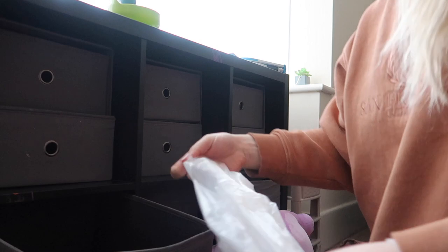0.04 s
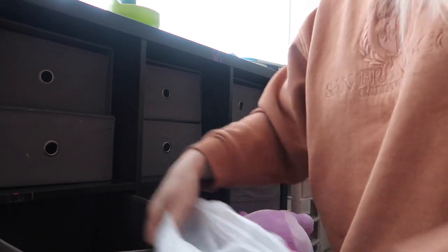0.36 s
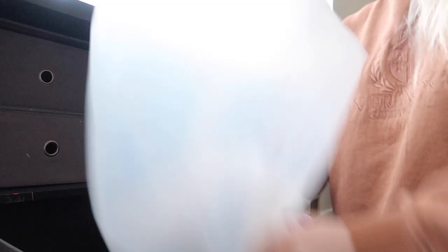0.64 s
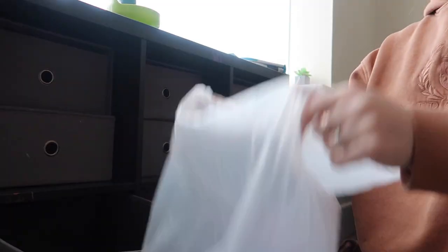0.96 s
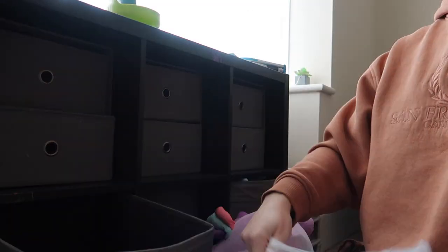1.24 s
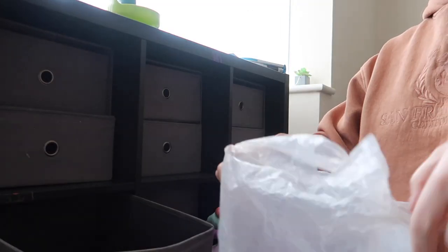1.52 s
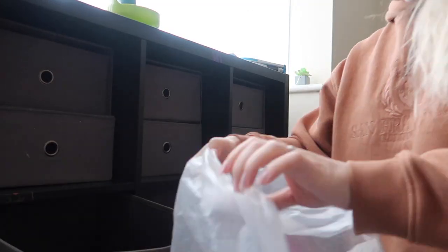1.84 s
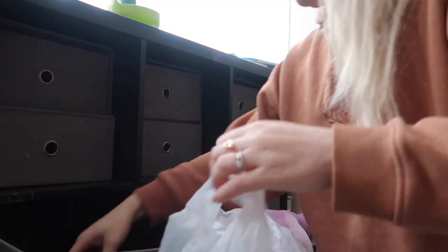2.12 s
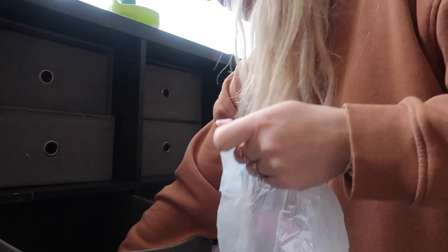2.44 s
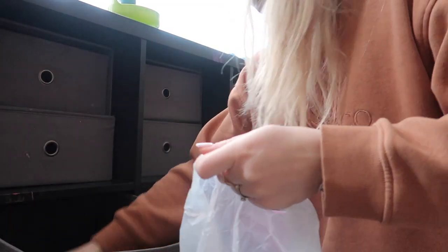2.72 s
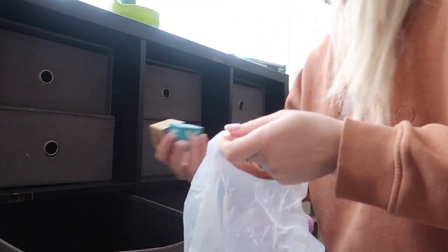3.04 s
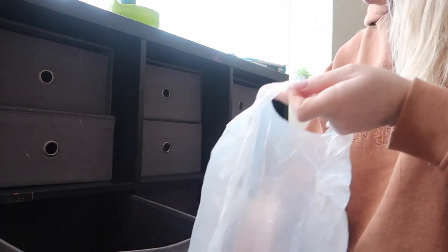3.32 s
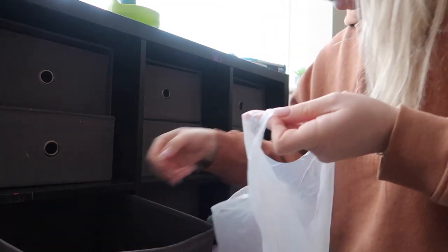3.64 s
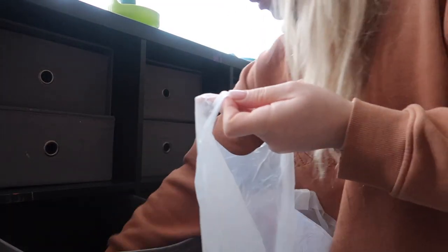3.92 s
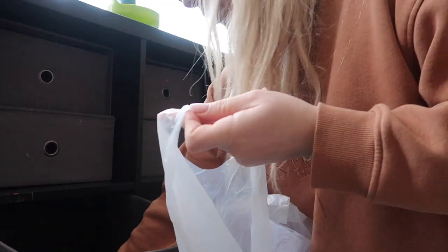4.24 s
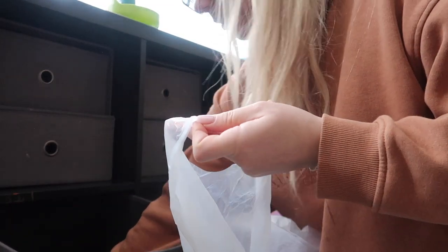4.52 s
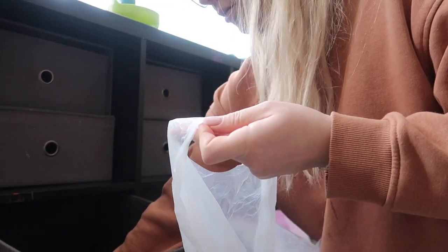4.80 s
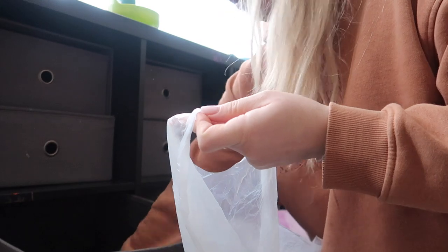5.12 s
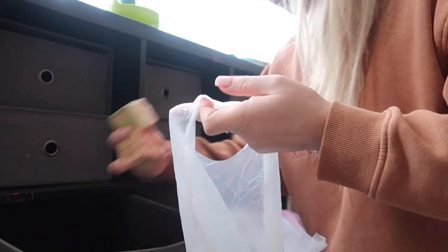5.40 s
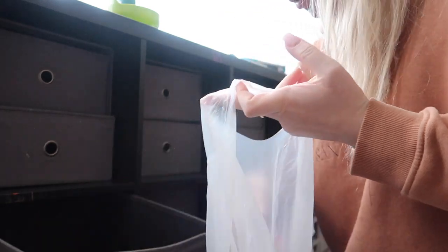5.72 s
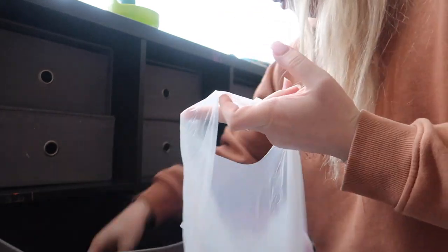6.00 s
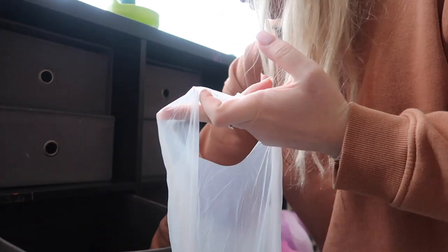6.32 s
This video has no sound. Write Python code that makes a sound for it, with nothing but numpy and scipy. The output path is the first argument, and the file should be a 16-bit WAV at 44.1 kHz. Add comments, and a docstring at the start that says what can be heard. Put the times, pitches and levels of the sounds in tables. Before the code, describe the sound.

Two brisk shakes open a thin plastic bag, which crackles and flaps close by. Softer thumps and clicks follow as hollow plastic toys are pushed around a fabric bin. The bag rustles and snaps as a toy goes in, the digging resumes, and another toy lands in the bag with a very sharp crack. The small furnished room has little echo and a faint, low hum throughout.

```python
"""A thin plastic bag is shaken open twice, close by in a small furnished room: its creases buckle
and its film billows. From 2.3 s a hand rummages in a fabric bin, where toys thud, clack and scrape.
At 3.5 s a toy slides into the bag and snaps the film taut. More rummaging follows, and at 5.9 s a
second toy drops in with the loudest snap, which briefly ducks the sound through a gain control.
A low hum lies underneath throughout."""
import sys
import numpy as np
from scipy import signal
from scipy.fft import rfft, irfft
from scipy.io import wavfile
from scipy.ndimage import uniform_filter1d

SR = 44100
rng = np.random.default_rng(int(sys.argv[2]) if len(sys.argv) > 2 else 0)


def unload_audio(sound):
    """Save the sound as a 16-bit wav file, at the path given as the first command line argument."""
    columns = np.transpose(np.atleast_2d(sound))
    # keep every value between -1 and 1, then stretch to whole-number steps
    steps = np.round(np.clip(columns, -1, 1) * 32767)
    wavfile.write(sys.argv[1], SR, steps.astype(np.int16))


N = 284886
TIME = np.arange(N) / SR

# a toy bumps the soft bin or the bottom of the bag: (time [s], level [dB], pitch [Hz])
BUMPS = [(2.337, -24.5, 346), (2.348, -32, 295), (2.371, -29.5, 268), (2.433, -28, 309), (2.447, -23, 142),
         (2.569, -34, 279), (2.873, -27, 281), (2.906, -30.5, 260), (2.934, -39, 270), (3.571, -29, 329),
         (3.606, -23, 91), (3.72, -39, 328), (4.02, -30.5, 178), (4.044, -28.5, 301), (4.076, -32, 256),
         (4.092, -29, 121), (4.124, -30.5, 186), (4.162, -28, 344), (4.174, -26.5, 131), (4.187, -32, 252),
         (4.406, -35.5, 308), (4.486, -31.5, 294), (4.513, -31, 216), (4.546, -34, 215), (4.667, -27, 367),
         (4.678, -28, 83), (4.858, -32, 217), (4.884, -33, 127), (5.216, -24, 285), (5.225, -30.5, 140),
         (5.238, -29.5, 273), (5.2561, -35, 277), (6.242, -38, 365), (6.331, -36.5, 350)]
# normal modes of three hollow toys: (frequency [Hz], level [dB], t60 [s])
SMALL_SHELL = [(2140, 4.5, 0.026), (2240, -1, .03), (2650, -5, .03)]
WIDE_SHELL = [(1420, -5, 0.029), (2307, -1, 0.04), (2450, -2, 0.033), (2880, 1, 0.029), (3470, -2.5, 0.024),
              (3960, -10, 0.033)]
BOXY_SHELL = [(1290, -6, .035), (2710, -3, 0.023), (3030, 4.5, 0.022), (4050, -3.5, 0.032)]


def bag_rustle(film_db=-4.5, billow_db=-1.5, fine_db=-19, calm_db=-12, bright_hz=4200,
               clump_db=0.73, rub=0.86, pitched=0.67, flutter_db=0.8, flutter_from_db=-19):
    """Buckling: creases give way in clumps over friction hiss, while the loose sheet flaps below."""
    # spectra of the crinkling, the tiniest creases and the billowing: (frequency [Hz], level [dB])
    crinkle_spectrum = [(150, -10.5), (400, -3), (780, -3.5), (1050, -2), (1350, -3.5), (1750, -0.1),
                        (2300, 0.9), (3200, 2.1), (4100, -0.5), (5200, -5), (7000, -7), (10500, -16),
                        (13000, -17.5), (15400, -26)]
    fine_spectrum = [(1000, -26), (4000, 3), (7000, -11), (10500, -13), (13000, 2), (15400, -12)]
    billow_spectrum = [(20, -32), (45, 13), (78, 6), (120, 0.5), (180, 1.5), (300, 2), (520, -1.5),
                       (900, -13), (2000, -33), (6000, -33)]
    level, brightness, billow = handling()
    treble_gain = brightness / amp(calm_db)  # fast strokes are brighter
    buckling = crackle(per_s=2600, spread_db=1.5) + pitched * creases()
    buckling *= amp(clump_db * wander(hz=54.7))
    friction = rub * rng.standard_normal(N)
    film = unit(colour(shifting_shape(buckling + friction), crinkle_spectrum))
    treble = signal.sosfiltfilt(highpass(bright_hz), film)
    film += treble * (treble_gain - 1)
    fine = unit(colour(crackle(per_s=400, spread_db=2.2), fine_spectrum))
    film += amp(fine_db) * fine * treble_gain
    speed = level / (level + amp(flutter_from_db))
    film *= amp(flutter_db * speed * wander(hz=170))  # a faster sheet flutters harder
    flaps = colour(crackle(per_s=1100, spread_db=3.5), billow_spectrum)
    flaps = unit(signal.sosfilt(highpass(hz=70), flaps))  # a light sheet radiates little deep bass
    return amp(film_db) * level * film + amp(billow_db) * billow * flaps


def handling(held_db=-46, held_bright_db=-21, flap_db=-42, flap_from_db=-25, flap_slope=0.93):
    """Incoherent addition: movements sum in power to give the crinkle, brightness and billow gains."""
    # the hands shift their grip: (time [s], length [s], crinkle [dB], brightness [dB])
    grips = [(0, 0.15, -24.5, -14.5), (0.45, 0.25, -24, -16.5), (0.79, 0.14, -25, -15.5),
             (1.149, 0.042, -21.5, -13.5), (1.337, 0.12, -33.5, -17), (1.61, 0.13, -44, -22),
             (1.86, 0.14, -38, -15.5), (2.2, 0.039, -33, -16.5), (2.575, 0.18, -44, -15),
             (2.933, 0.15, -41, -16.5), (3.316, 0.065, -38, -16.5), (3.603, 0.037, -29, -17.5),
             (3.85, 0.13, -38.5, -19.5), (5.158, 0.36, -46, -18.5), (5.642, 0.047, -39, -13),
             (5.806, 0.14, -28.5, -16.5)]
    # a tug, a shake or a falling toy jerks the bag:
    # (time [s], length [s], attack [s], release [s], crinkle [dB], brightness [dB], billow [dB])
    jerks = [(0.189, 0.024, 0.0099, 0.034, -25, -14, -35), (0.644, 0.046, 0.03, 0.029, -11.5, -11.5, -24.5),
             (1.198, .004, 0.024, .0015, -13, -20, -24), (1.214, 0.014, 0.0023, .004, -10.5, -21.5, -18.5),
             (1.245, .004, .01, .03, -21, -15, -27.5), (1.794, 0.0083, 0.002, 0.019, -36.5, -16, -50),
             (1.942, 0.013, 0.013, .033, -35.5, -18, -66), (3.28, 0.0088, .008, .033, -43, -12.5, -58),
             (3.51, 0.04, 0.014, .033, -22, -15.5, -45), (3.559, 0.015, 0.0089, 0.027, -17.5, -14, -23.5),
             (5.909, 0.037, 0.005, 0.033, -18, -16, -40)]
    power, treble = amp(held_db) ** 2, amp(held_db + held_bright_db) ** 2
    for s, length, db, bright_db in grips:
        grip = swell(s, length, attack_s=0.079, release_s=0.16)
        power += (amp(db) * grip) ** 2
        treble += (amp(db + bright_db) * grip) ** 2
    # billowing follows the crinkle by a power law
    billow = amp(flap_db) ** 2 * (power / amp(flap_from_db) ** 2) ** flap_slope
    for s, length, attack_s, release_s, db, bright_db, billow_db in jerks:
        jerk = swell(s, length, attack_s, release_s)
        power += (amp(db) * jerk) ** 2
        treble += (amp(db + bright_db) * jerk) ** 2
        billow += (amp(billow_db) * jerk) ** 2
    return np.sqrt([power, treble / power, billow])


def creases(per_s=220, spread_db=1.0, q=1.23, count=8):
    """Damped resonance: each small crease buckles and rings briefly at its own pitch."""
    resonators = [signal.iirpeak(hz, q, fs=SR) for hz in np.geomspace(900, 11000, count)]
    return unit(sum(signal.lfilter(b, a, crackle(per_s, spread_db)) for b, a in resonators))


def shifting_shape(x, patchy_db=2.0, size=512, patch_frames=11, patch_bins=5):
    """Time-varying filtering: as the film changes shape, narrow parts of its spectrum come and go."""
    frames = dict(nperseg=size, noverlap=size * 3 // 4)
    spectra = signal.stft(x, **frames)[2]
    patches = uniform_filter1d(rng.standard_normal(spectra.shape), patch_frames, axis=1)
    patches = unit(uniform_filter1d(patches, patch_bins, axis=0))
    return signal.istft(spectra * amp(patchy_db * patches), **frames)[1][:N]


def film_snaps(rise_cycles=0.54):
    """Heavily damped oscillation: film pulled taut gives one stiff pulse of a few cycles at most."""
    # the film snaps taut: (time [s], peak level [dB], pitch [Hz], decay constant [cycles])
    snaps = [(.073, -14, 2390, 0.54), (0.1985, -7, 2240, 0.2), (.642, -10.5, 760, 0.5), (.65, -4, 3660, .7),
             (0.6908, -0.5, 3140, 0.79), (0.7886, -11.5, 780, 0.41), (1.188, -22, 533, 2.6),
             (1.198, -2, 2500, 0.66), (1.2004, -2.5, 2110, 0.65), (1.218, -11.5, 560, 1.1),
             (1.22, -6, 1880, 0.54), (1.228, -14, 2700, 0.53), (1.795, -29, 4500, .4),
             (3.571, -1.5, 1400, 0.16), (3.5855, -8.5, 1790, 1.9), (5.7168, -16.5, 2050, 0.51),
             (5.892, -4, 1710, 0.59), (5.9296, 3.5, 1980, 1.3), (5.9313, 5, 2860, 0.87),
             (5.9322, -2.5, 1760, 1.3), (5.935, 4, 2560, 1.2)]
    out, t = np.zeros(N), np.arange(SR // 20) / SR
    for s, db, hz, decay_cycles in snaps:
        cycles = hz * t
        envelope = np.exp(-cycles / decay_cycles) * (1 - np.exp(-cycles / rise_cycles))
        pulse = envelope * np.sin(2 * np.pi * cycles)
        add(out, s, amp(db) * pulse / abs(pulse).max())
    return out


def bin_thuds(thud_db=8, rise_cycles=0.64, detune_share=0.14):
    """Modal response: the soft bin's pitch and mode spacing depend on where it is hit."""
    # modes of the bin: (frequency [multiple of the pitch], level [dB], t60 [s])
    modes = [(.4, -13, 0.093), (0.68, -7, 0.092), (1, 5.5, 0.058), (1.25, -3.5, .04), (1.9, -4, 0.027)]
    out, t = np.zeros(N), np.arange(SR // 5) / SR
    for s, db, hz in BUMPS:
        detune = 1 + detune_share * rng.standard_normal(len(modes))
        ring = sum(damped_sine(t, hz * ratio ** stretch, mode_db, t60)
                   for (ratio, mode_db, t60), stretch in zip(modes, detune))
        onset = 1 - np.exp(-(hz * t / rise_cycles) ** 2)  # the cushioned blow builds up
        add(out, s, amp(db + thud_db) * ring * onset)
    return out


def toy_clacks(clack_db=-2, rattle_t60=0.12, crack=1.2, crack_s=0.0032, shell_q=4.4, shell_t60=0.036,
               tick_db=-16.5, tick_hz=1170, tick_tone=1.1, tick_ring_db=-30, size=4096):
    """Hard impact: toys meet with a crack that excites a rattle, the shell's modes and small parts."""
    # toys collide: (time [s], level [dB], pitch [Hz], shell to rattle [ratio], small parts [dB])
    clacks = [(2.337, -23, 1880, 0.47, -33), (2.347, -34, 2130, 0.94, -25), (2.57, -20, 2090, 0.95, -3),
              (2.582, -30, 2830, 0.3, 0), (4.05, -32.5, 1410, 0.39, -25), (4.16, -38, 806, 0.6, -30),
              (4.184, -27, 1520, 0.47, -26), (4.351, -39.5, 880, 1, -30), (4.484, -37, 1330, 1.4, -30),
              (4.841, -37.5, 3330, .4, -8), (4.939, -37, 1500, 0.64, -24), (4.951, -33.5, 2400, 1.4, -24),
              (5.174, -38, 1700, 0.88, -22), (5.929, -16, 2380, 0.48, 8), (6.243, -29, 1170, 0.24, -19),
              (6.329, -39.5, 1240, 0.43, -20.5), (6.36, -40, 2400, 0.41, -11)]
    # spectrum of hard plastic: (frequency [multiple of the pitch], level [dB])
    plastic = [(.08, -41), (.3, 1), (.65, 11), (0.998, 8), (1.35, 10), (1.9, 4), (2.6, -7), (5, -17)]
    # modes of a toy's small hard parts: (frequency [Hz], level [dB], t60 [s])
    small_parts = [(3050, -1, 0.03), (4480, -7, .025), (5250, 0, .02), (5530, 1, 0.02), (7080, 5, 0.02),
                   (7360, 5, 0.02)]
    # dulling by the fabric around the toys: (frequency [Hz], gain [dB])
    muffling = [(1000, 1), (3700, -2.5), (4700, -1.5), (7300, -9.5), (9000, -3), (15000, -42)]
    out, t = np.zeros(N), np.arange(size) / SR
    decay = amp(-60 * t / rattle_t60) + crack * np.exp(-t / crack_s)
    # each bump also draws a dull tick from the toy itself
    ticks = [(s, db + tick_db, tick_hz * 2 ** rng.normal(0, 0.15), tick_tone, tick_ring_db)
             for s, db, _ in BUMPS]
    for s, db, hz, tone, ring_db in clacks + ticks:
        spectrum = [(ratio * hz, level) for ratio, level in plastic]
        rattle = unit(colour(rng.choice([-1, 1], size), spectrum) * decay)
        resonance = signal.iirpeak(hz, shell_q, fs=SR)
        shell = signal.filtfilt(*resonance, rng.standard_normal(size), padtype="even")
        shell = unit(shell * amp(-60 * t / shell_t60))
        parts = unit(sum(damped_sine(t, part_hz * rng.normal(1, 0.0081), part_db, t60)
                         for part_hz, part_db, t60 in small_parts))
        body = unit(rattle + tone * shell) + amp(ring_db) * parts
        add(out, s, amp(db + clack_db) * strike(body, t, contact_s=0.00084))
    return colour(out, muffling)


def toy_knocks(rattle_db=-9, rattle_t60=0.097, pair_share=0.031, uneven_db=2.0, size=4096):
    """Beating modes: a struck hollow toy rattles briefly and rings in close pairs of frequencies."""
    # a hollow toy is struck: (time [s], level [dB], tilt [dB/octave], shell [table of modes])
    knocks = [(2.4695, -29, 4, SMALL_SHELL), (4.436, -34.5, 13, WIDE_SHELL), (4.556, -39, 0, WIDE_SHELL),
              (4.64, -36, -6, WIDE_SHELL), (4.657, -25.5, 1, WIDE_SHELL), (4.669, -28, 6, WIDE_SHELL),
              (4.684, -27.5, -9, WIDE_SHELL), (5.216, -35.5, 10, BOXY_SHELL), (5.229, -31, 3, BOXY_SHELL),
              (5.24, -40, 4, BOXY_SHELL), (5.277, -37, -11, BOXY_SHELL)]
    # spectrum of its rattle: (frequency [Hz], level [dB])
    rattle_spectrum = [(300, -32), (900, 3.5), (2500, 6.5), (3600, -4), (5000, -6), (9000, -16.5),
                       (15000, -43)]
    out, t = np.zeros(N), np.arange(size) / SR
    for s, db, tilt_db, modes in knocks:
        ring = np.zeros(size)
        for hz, mode_db, t60 in modes:
            struck_db = mode_db + tilt_db * np.log2(hz / 1000) + uneven_db * rng.standard_normal()
            twin_hz = hz * (1 + pair_share * rng.standard_normal())
            twin = .5 * np.sin(2 * np.pi * (twin_hz * t + rng.random()))
            ring += amp(struck_db - 60 * t / t60) * (np.sin(2 * np.pi * hz * t) + twin)
        rattle = colour(rng.choice([-1, 1], size) * amp(-60 * t / rattle_t60), rattle_spectrum)
        body = unit(ring) + amp(rattle_db) * unit(rattle)
        add(out, s, amp(db) * strike(body, t, contact_s=0.00033))
    return out


def rummage(cloth_db=5.5, grate_db=-6, catch_db=4, slip_limit=9):
    """Stick-slip friction: shoved toys bump along the fabric and grate over each other in fits."""
    # toys are pushed around, and toy slides over toy: (time [s], length [s], level [dB])
    shoves = [(2.363, 0.16, -39.5), (4.052, 0.21, -41.5), (4.47, 0.09, -39.5), (4.669, 0.02, -34),
              (4.871, 0.15, -41.5), (5.23, 0.041, -40), (6.27, 0.23, -47.5)]
    scrapes = [(2.34, 0.082, -35), (4.445, 0.015, -31.5), (4.525, 0.009, -34), (4.66, 0.055, -26.5),
               (4.944, 0.014, -35), (4.988, 0.032, -40), (5.245, .025, -40), (6.434, 0.016, -38.5)]
    # spectra of the bin's fabric and of plastic on plastic: (frequency [Hz], level [dB])
    cloth_spectrum = [(25, -34), (62, -12), (90, 14), (150, 7), (215, 9.5), (330, 9.5), (480, 5),
                      (750, -5.5), (1500, -15.5), (4000, -42), (15000, -66)]
    grate_spectrum = [(300, -18), (700, 22), (1200, 14), (2400, 17.5), (4100, 9.5), (4900, 2.5),
                      (8000, -22), (15000, -25)]
    pushed = sum(amp(db) * swell(s, length, attack_s=0.037, release_s=0.048) for s, length, db in shoves)
    scraped = sum(amp(db) * swell(s, length, attack_s=0.018, release_s=0.017)
                  for s, length, db in scrapes)
    bumps = unit(colour(crackle(per_s=1100, spread_db=4.0), cloth_spectrum))
    slips = np.tanh(crackle(per_s=1600, spread_db=-6.5) / slip_limit)
    catching = amp(catch_db * np.tanh(wander(hz=90)))
    grating = unit(colour(slips, grate_spectrum) * catching)
    return amp(cloth_db) * pushed * bumps + amp(grate_db) * scraped * grating


def background(air_db=-54, waver_db=0.5, drift_rad=0.15,
               drone_hz=53.8, drone_db=-5, throb_db=-2.0, drone_drift_rad=0.96):
    """Amplitude and phase modulation: a faint hum wavers and a deep drone throbs over the room air."""
    # lines of the hum and spectrum of the still room: (frequency [Hz], level [dB])
    hum_lines = [(199.2, -57), (301.5, -62), (1055, -66.5)]
    air_spectrum = [(20, -10), (40, -8), (75, 3), (110, -5), (250, -0.5), (500, -9.5), (1000, -7.5),
                    (3000, -23), (5000, -34), (9000, -45), (15000, -55)]
    # slow course of the drone: (time [s], level [dB])
    drone_levels = [(0.0, -48), (1.45, -54), (1.65, -43), (2.09, -48), (2.4, -38), (2.9, -42.5),
                    (3.3, -53.5), (3.9, -48), (5.7, -48.5), (6.0, -68), (6.46, -65)]
    hum = 0
    for hz, db in hum_lines:
        gain = amp(db + waver_db * wander(hz=0.84))
        hum += gain * np.sin(2 * np.pi * hz * TIME + drift_rad * wander(hz=3.7))
    course_db = np.interp(TIME, *np.transpose(drone_levels))
    throb = amp(drone_db + course_db + throb_db * wander(hz=5.2))
    drone = throb * np.sin(2 * np.pi * drone_hz * TIME + drone_drift_rad * wander(hz=5.2))
    air = unit(colour(rng.standard_normal(N), air_spectrum))
    return np.sqrt(2) * (hum + drone) + amp(air_db) * air


def room(x, gap_s=0.0073, size=256):
    """Reverberation: diffuse reflections start after a short gap and decay band by band."""
    # reverberation time of the room: (frequency [Hz], t60 [s])
    decay_times = [(100, 0.63), (660, 0.37), (1740, 0.41), (4600, 0.27), (14000, 0.42)]
    t = np.arange(SR // 2) / SR
    hz, s, spectra = signal.stft(rng.standard_normal(len(t)) * (t > gap_s), SR, nperseg=size)
    decay = amp(-60 * s / at_hz(decay_times, hz)[:, None])
    tail = signal.istft(spectra * decay, SR, nperseg=size)[1]
    return signal.fftconvolve(x, tail / np.linalg.norm(tail))[:N]


def stereo(mid, toys, direct_db=-3, diffuse_db=-5, toy_echo_db=-18, air_db=-67, size=2048):
    """Decorrelation: two close microphones share the bass but differ in treble, toy echoes and air."""
    # side signal against mid: (frequency [Hz], gain [dB])
    width = [(60, -62), (200, -38), (380, -19), (700, -20), (1290, -70), (2400, -79), (3400, -16),
             (4600, -4.5), (8100, 0.5), (11000, 8), (15000, -4)]
    # room air that differs between the microphones: (frequency [Hz], level [dB])
    air_spectrum = [(30, -44), (100, -12), (280, -5), (500, -15), (900, -14.5), (1500, -27), (3000, -31),
                    (15000, -66)]
    t = np.arange(size) / SR
    scatter = rfft(rng.standard_normal(size) * np.exp(-t / .009) * (t > .001))
    allpass = np.roll(irfft(scatter / abs(scatter)), size // 2)  # each frequency has its own delay
    direct = amp(direct_db) * signal.oaconvolve(mid, allpass, "same")
    side = colour(direct + amp(diffuse_db) * room(mid), width)
    side += amp(toy_echo_db) * room(toys)
    side += amp(air_db) * unit(colour(rng.standard_normal(N), air_spectrum))
    return np.array([mid + side, mid - side])


def gain_control(x, sense_s=0.012, threshold_db=-16, recover_db_per_s=12):
    """Compression: the gain drops quickly by the excess over a threshold and recovers slowly."""
    pole = np.exp(-1 / (sense_s * SR))
    smoother = [1 - pole], [1, -pole]
    power_db = 10 * np.log10(signal.lfilter(*smoother, (x ** 2).mean(0)) + 1e-12)
    recovery_db = TIME * recover_db_per_s
    held_db = np.maximum.accumulate(power_db + recovery_db) - recovery_db
    excess_db = np.maximum(held_db - threshold_db, 0)
    return x * amp(-signal.lfilter(*smoother, excess_db))


def strike(body, t, contact_s):
    """Finite contact time rounds the onset of a hit; its first 10 ms are scaled to rms 1."""
    hit = body * (1 - np.exp(-(t / contact_s) ** 2))
    return hit / np.std(hit[:SR // 100])


def damped_sine(t, hz, db, t60):
    """Free vibration of one mode, falling 60 dB in t60 seconds."""
    return amp(db - 60 * t / t60) * np.sin(2 * np.pi * hz * t)


def swell(start, length, attack_s, release_s):
    """Exponential envelope of a movement: it builds up to its start, holds at 1, then dies away."""
    return np.exp(np.minimum(TIME - start, 0) / attack_s
                  - np.maximum(TIME - start - length, 0) / release_s)


def crackle(per_s, spread_db):
    """Poisson process: sparse impulses of random sign and size, at rms 1."""
    size = amp(spread_db * np.minimum(rng.exponential(1, N), 4))
    return unit(size * rng.choice([-1, 1], N) * (rng.random(N) < per_s / SR))


def wander(hz):
    """Low-pass noise of rms 1 that changes about hz times a second."""
    rolloff = 1 + (np.fft.rfftfreq(N, 1 / SR) / hz) ** 4
    return unit(irfft(rfft(rng.standard_normal(N)) / rolloff, N))


def colour(x, points, size=4096):
    """Minimum-phase filter with the given spectrum, so that clicks keep their sharp fronts."""
    log_gain = np.log(amp(at_hz(points, abs(np.fft.fftfreq(size, 1 / SR)))))
    taps = np.fft.ifft(np.exp(np.conj(signal.hilbert(log_gain)))).real
    return signal.oaconvolve(x, taps[:size // 2])[:len(x)]


def highpass(hz):
    """Coefficients of a second-order high-pass."""
    return signal.butter(2, hz, "high", fs=SR, output="sos")


def at_hz(points, hz):
    """Interpolation on a log-frequency axis."""
    frequency, value = np.transpose(points)
    return np.interp(np.log(hz + 1), np.log(frequency), value)


def amp(db):
    """Decibels to amplitude ratio."""
    return 10 ** (np.asarray(db) / 20)


def unit(x):
    """Normalisation to rms 1."""
    return x / np.sqrt(np.mean(x ** 2) + 1e-20)


def add(mix, s, sound):
    """Superposition of a sound on the mix at time s."""
    part = mix[max(0, round(s * SR)):][:len(sound)]
    part += sound[:len(part)]


def scene(film_room_db=-8, snap_room_db=-7, bin_room_db=-10, toy_room_db=-6):
    """Direct and reverberant sound add up; the near bag and the farther bin have their own echoes."""
    film, snaps = bag_rustle(), film_snaps()
    fabric_bin = bin_thuds() + rummage()
    toys = toy_clacks() + toy_knocks()
    echo = room(amp(film_room_db) * film) + room(amp(snap_room_db) * snaps)
    echo += room(amp(bin_room_db) * fabric_bin + amp(toy_room_db) * toys)
    return stereo(film + snaps + fabric_bin + toys + echo + background(), toys)


def record(dry, edge_hz=15600):
    """Overload: the hardest snap clips and ducks what follows; a low-pass then limits the band."""
    clipped = np.clip(gain_control(dry), -1, 1)
    lowpass = signal.firwin(511, edge_hz, window=("kaiser", 9), fs=SR)
    return signal.oaconvolve(clipped, lowpass[None], "same")


dry = scene()
out = record(dry)
unload_audio(out)
```